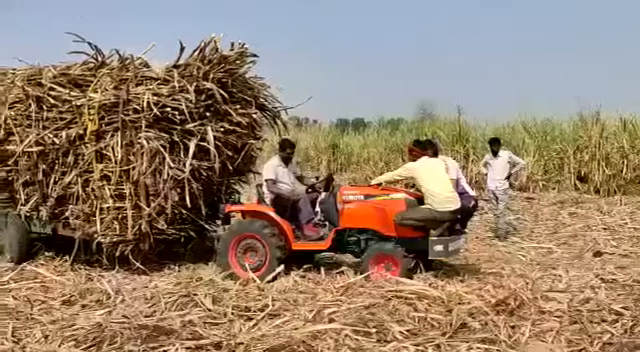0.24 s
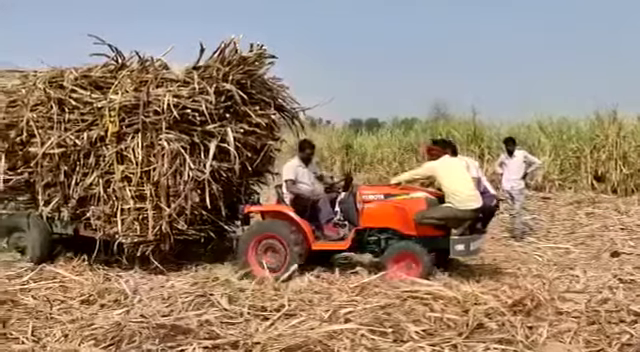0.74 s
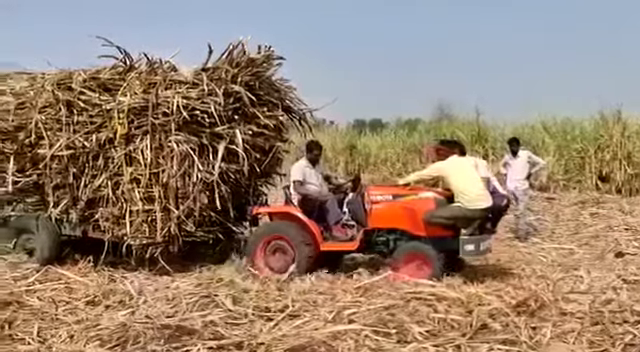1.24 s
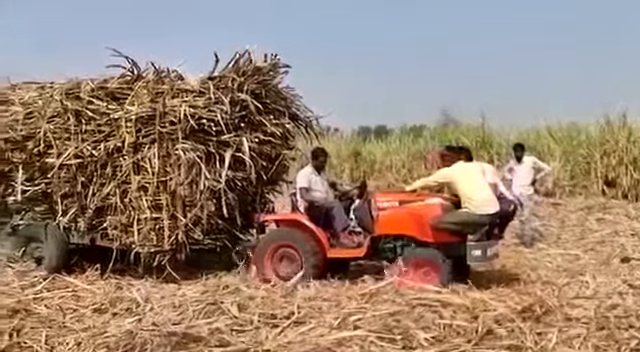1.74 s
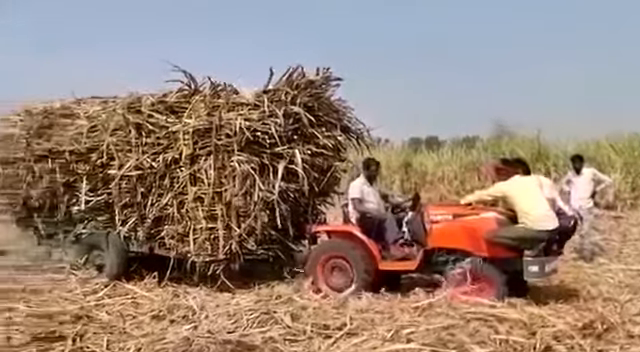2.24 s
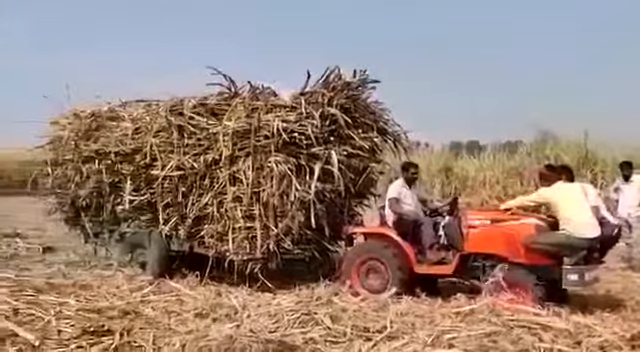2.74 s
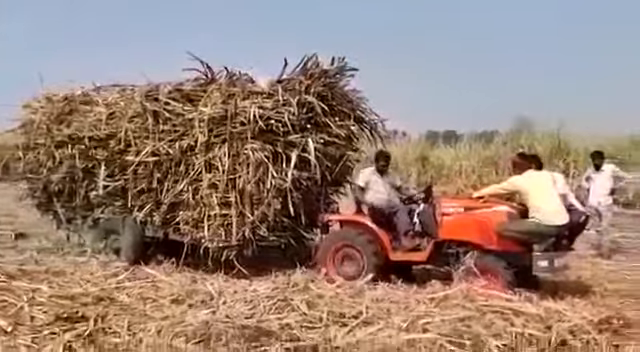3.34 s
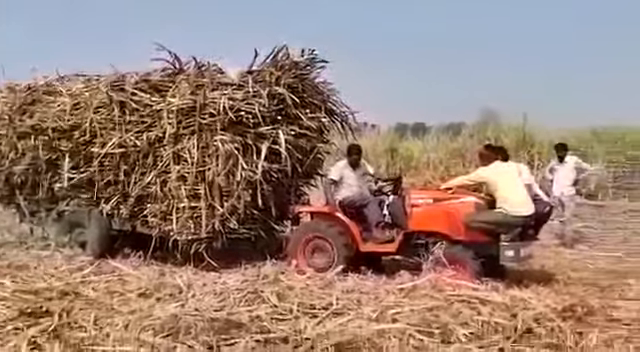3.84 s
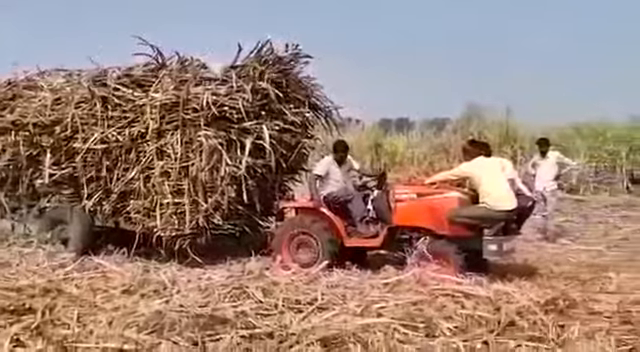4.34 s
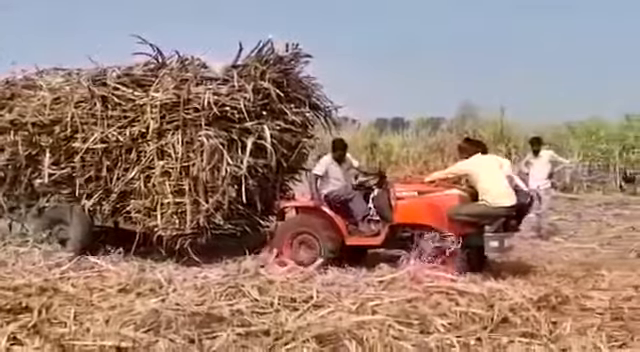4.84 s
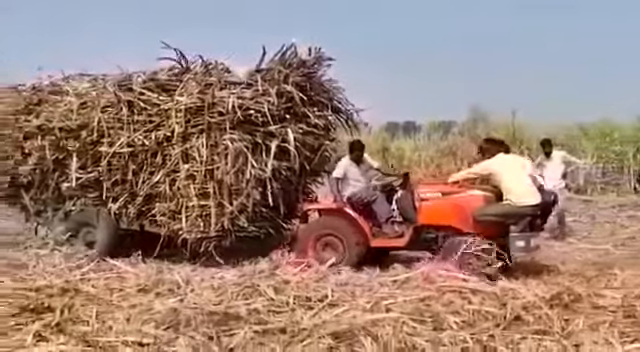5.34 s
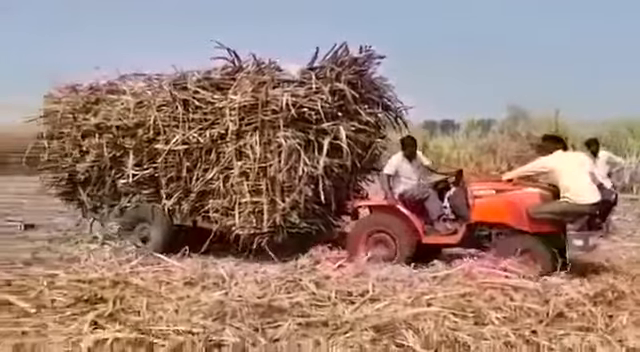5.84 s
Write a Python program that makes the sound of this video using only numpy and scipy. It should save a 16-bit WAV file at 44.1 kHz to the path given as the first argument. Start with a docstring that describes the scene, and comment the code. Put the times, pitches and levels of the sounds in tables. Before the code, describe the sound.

Outdoors in a field, heard from a few metres off, a small tractor's diesel engine climbs in speed, throbbing and clattering, its gears whining and chattering. The revs fall away to a knocking idle, then quickly rise again and stay steady as it pulls. The trailer hitch clanks twice, dry stalks crack under the wheels, and a short rising squeal comes at the close.

```python
"""Small diesel tractor hauling a load

A few metres away, a tractor drags a heavy trailer over a stubble field. It revs up with its gears
whining, sinks to idle, then revs again and holds. Each firing thumps through the exhaust pipe and
rattles the engine block. The hitch clanks, and dry stalks snap under the wheels."""
import sys
import numpy as np
from scipy import signal
from scipy.fft import rfft, irfft
from scipy.io import wavfile
from scipy.ndimage import uniform_filter1d

SR = 44100
rng = np.random.default_rng(int(sys.argv[2]) if len(sys.argv) > 2 else 0)


def dump(signal):
    """Clip the signal to [-1, 1] and save it as 16-bit WAV at the path in sys.argv[1]."""
    limited = np.clip(np.atleast_2d(signal).T, -1, 1)
    pcm = np.round(limited * 32767).astype(np.int16)
    wavfile.write(sys.argv[1], SR, pcm)


N = 268128
T = np.arange(N) / SR
HZ = np.fft.rfftfreq(N, 1 / SR)
WORKING_SPEED = 50  # engine speed is always in firings a second

# How strong each of the three cylinders is, in dB.
CYLINDER_DB = [0.68, 0.039, -.2]
# The exhaust note briefly swells or dips at set moments, mostly as the throttle opens or closes.
# Each row: middle in seconds, length in seconds, change in dB.
EXHAUST_SWELLS = [(.03, 0.07, 7), (2.02, 0.048, -5.5), (2.14, 0.29, 7.5), (2.38, 0.16, 2),
                  (3.76, 0.065, -1.5), (3.95, .1, 0.5), (4.08, 0.18, 2.5), (4.25, 0.15, 1.5)]
# How the pipe and silencer shape the sound, with the throttle open and when coasting.
# Each row: frequency in Hz, gain in dB.
PIPE_OPEN = [(30, -12), (65, -4), (100, -4.5), (122, -3), (138, -7.5), (152, -0.5), (166, 2), (182, 7),
             (205, -2.5), (232, 5), (258, 5), (285, -3), (335, -14.5), (420, -49.5), (700, -43)]
PIPE_COAST = [(30, -20.5), (70, -5.5), (110, -11.5), (140, -3), (172, 7), (202, 1.5), (238, 2), (272, -9),
              (310, -9.5), (400, -17.5), (700, -41)]
# How loud the deep throb and the exhaust note are. Each holds: level in dB coasting at working
# speed, dB added per doubling of speed, dB added by full throttle, dB added by full load.
THROB_LEVELS = (-34, -1.5, -6.5, 4)
EXHAUST_LEVELS = (-30.5, 10.5, 7, 2.5)

def exhaust(firings, speed, fuel, load):
    """Uneven firing pulses and their rushing gas ring the pipe, over a deep throb."""
    # the cylinders fire at slightly unequal steps, each a little early or late
    limp = .009 * np.sin(2 * np.pi * firings / len(CYLINDER_DB))
    ignition = firings + limp + .0035 * drift(40)
    strength = amp(CYLINDER_DB)[ignition.astype(int) % len(CYLINDER_DB)]
    # at low speed the rising piston adds a second, softer puff
    slowness = np.clip(2 - 2 * speed / WORKING_SPEED, 0, 1)
    push = amp(-6) * slowness * clicks(firings + .395, uneven_db=.5)
    pulses = steady(clicks(ignition, uneven_db=1.5) * strength + push) * amp(swells(EXHAUST_SWELLS))
    gas = steady(puffs(firings, decay_s=.024, base=.94, uneven_db=5.5) * noise())
    ragged = (1 - fuel) * np.interp(speed, [48, 60], [1, 0])  # slow running on little fuel
    flow = pulses + amp(-13.5 + 9.5 * ragged) * gas
    # the silencer holds higher notes back, drawing out each thump
    delay_s = .0055 * np.clip(HZ / 200, 0, 2)
    lag = 2 * np.pi * np.cumsum(delay_s) * SR / N
    flow = filtered(flow, np.exp(-1j * lag) * (HZ > 10))
    note = unit(fuel * ring(flow, curve(PIPE_OPEN)) + (1 - fuel) * ring(flow, curve(PIPE_COAST)))
    # one chamber hums on between slow, hard firings
    note += slowness * fuel * amp(-4) * resonance(flow, hz=208, width_hz=30)
    # near top speed the governor (a speed limiter) eases the fuel, thinning the bass
    bass_db = -3 * np.clip((speed - 64.4) / 1.8, 0, 1)
    note += (amp(bass_db) - 1) * filtered(note, 1 / (1 + (HZ / 215) ** 20))
    note *= amp(loudness(EXHAUST_LEVELS, np.minimum(speed, 51.7), fuel, load))
    throb = np.sqrt(2) * np.sin(2 * np.pi * firings) * amp(loudness(THROB_LEVELS, speed, fuel, load))
    throb /= 1 + (31.2 / speed) ** 6  # very slow firing hardly carries
    return stereo(throb - note)

# The block's roar. Each row: frequency in Hz, noise level in dB.
BLOCK_COLOUR = [(150, -1), (330, 0.5), (470, -2.5), (640, -2.5), (800, 3), (970, 5), (1200, -4),
                (1500, -2.5), (1800, -1.5), (2020, -4), (2250, -19), (3000, -10), (5000, -37.5)]
# How loud the block is, laid out like THROB_LEVELS.
BLOCK_LEVELS = (-36, 9, 3.5, 4)

def block(firings, speed, fuel, load):
    """Burning fuel shakes the engine block into a dull roar."""
    shake = puffs(firings, decay_s=.0062, base=1, uneven_db=4)
    pair = [unit(ring(shake * noise(), curve(BLOCK_COLOUR))) for _ in range(2)]
    return amp(loudness(BLOCK_LEVELS, speed, fuel, load)) * stereo(*pair)

# The noise of valves and injectors. Each row: frequency in Hz, noise level in dB.
CLATTER_COLOUR = [(1180, -40), (2000, -10), (2200, -7.5), (2410, -4), (2680, -10), (3300, -10), (3580, -7),
                  (4090, -7), (5070, -4.5), (6740, -4), (7680, 2.5), (9330, -3.5), (9800, -17),
                  (10500, -16), (13600, -59), (22000, -120)]
# Where different loose parts rattle. Each row: centre in Hz, width in Hz.
RATTLE_BANDS = [(2500, 820), (4600, 1240), (6600, 1300), (7800, 760), (9200, 1200)]
# The notes of thin covers. Each row: pitch in Hz, width in Hz, level in dB.
COVER_NOTES = [(2707, 16, -4), (3695, 18, -3), (4292, 26, -5), (4897, 18, 1), (6407, 15, -5)]
# How loud the clatter is, laid out like THROB_LEVELS.
CLATTER_LEVELS = (-33.5, 7, 2.5, 6)

def clatter(firings, speed, fuel, load, rattles_per_s=150):
    """Valves and injectors tick, loose parts rattle on their own, and thin covers buzz under load."""
    ticks = puffs(2 * firings, decay_s=.019, base=2.9, uneven_db=4)
    shares = np.array([np.exp(-((HZ - hz) / width) ** 2) + 1e-9 for hz, width in RATTLE_BANDS])
    colours = np.sqrt(shares / shares.sum(0)) * amp(curve(CLATTER_COLOUR))
    rattles = 0
    for colour in colours:
        strikes = np.cumsum(rng.random(N) < rattles_per_s / SR)
        flutter = amp(1.1 * drift(30))
        shake = (ticks + puffs(strikes, decay_s=.015, base=0, uneven_db=6.5)) * flutter
        rattles += filtered(shake * rng.standard_normal((2, N)), colour)
    buzz = load * amp(-11 + 3 * drift(5))
    pair = [unit(rattle) + buzz * unit(ring(noise(), peaks(COVER_NOTES))) for rattle in rattles]
    return amp(loudness(CLATTER_LEVELS, speed, fuel, load)) * stereo(*pair)

# Spells of hard knocking. Each row: start, end, fade-in and fade-out in seconds,
# level in dB at working speed.
KNOCK_SPELLS = [(-.04, 0.41, .04, 0.47, -38), (3.098, 3.898, 0.043, 0.23, -33),
                (3.9, 4.804, 0.23, 1.1, -35.5)]
# The notes each knock rings. Each row: pitch in Hz, width in Hz, level in dB.
KNOCK_NOTES = [(337, 103, -3.5), (990, 70, -0.5), (1440, 51, -13), (1750, 200, 1), (2006, 47, 7),
               (2640, 550, -8), (4030, 730, -14)]

def knock(firings, speed):
    """Diesel knock: a metallic ping per firing, standing out at idle and as the engine picks up."""
    level = spells(KNOCK_SPELLS, speed, db_per_doubling=11.5)
    pings = puffs(firings, decay_s=.008, base=.14, uneven_db=1.6)
    return level * stereo(*[steady(ring(pings * noise(), peaks(KNOCK_NOTES))) for _ in range(2)])

# Spells of rasping, laid out like KNOCK_SPELLS.
RASP_SPELLS = [(-.04, 0.34, 0.035, 0.23, -35), (3.734, 4.226, 0.13, 0.25, -34)]
# The rasp of injected fuel. Each row: frequency in Hz, noise level in dB.
RASP_COLOUR = [(1500, -34), (2800, -22), (3500, -2.5), (4600, 6), (6000, -5), (7600, 8.5), (8600, -16),
               (11000, -25)]

def rasp(firings, speed):
    """While the engine gathers speed, every squirt of fuel adds a bright, dry spit."""
    level = spells(RASP_SPELLS, speed, db_per_doubling=8.5)
    spits = steady(puffs(firings, decay_s=.004, base=.3, uneven_db=2))
    return level * stereo(*[unit(ring(spits * noise(), curve(RASP_COLOUR))) for _ in range(2)])

# The tones of each gear whine. Each row: cycles per firing, level in dB.
CLIMB_TONES = [(18.53, -0.5), (17.53, -17), (24.72, -22)]
CREST_TONES = [(13.9, 0), (12.4, -7), (23.05, -17), (37.15, -17)]
TOP_TONES = [(32.05, 0)]
SLACK_TONES = [(18.53, 0)]
PICKUP_TONES = [(11.3, -2), (16.95, 0), (18.2, -8), (28.3, -11)]
HAUL_TONES = [(19.81, 1.3), (11.27, -18), (16, -10.5), (16.95, -15), (21.34, -11), (26.37, -18.5),
              (26.92, -18), (32, -18)]
SHUDDER_TONES = [(16.9, 0)]
# Named sets of gears. Each entry: its tones, wobble in radians, fuzz in dB.
GEAR_SETS = {"climb": (CLIMB_TONES, .12, -20.5), "crest": (CREST_TONES, .24, -15.5),
             "top": (TOP_TONES, .3, -13), "slack": (SLACK_TONES, .5, -5),
             "pickup": (PICKUP_TONES, .35, -11), "haul": (HAUL_TONES, .12, -16),
             "shudder": (SHUDDER_TONES, .3, -9)}
# When each set whines. Each row: its name, then start, end, fade-in and fade-out in seconds,
# level in dB, change in dB per second.
GEAR_WHINES = [("climb", 0.558, 1.18, 0.2, 0.061, -17.5, -9.5),
               ("climb", 1.09, 1.59, 0.16, 0.2, -32.5, 1.6), ("climb", 1.68, 2.02, 0.29, 0.029, -29, 2.2),
               ("top", 1.64, 2.02, 0.22, 0.03, -38, 0), ("slack", 2.01, 2.12, 0.088, 0.051, -29, 0),
               ("crest", 0.99, 2.03, 0.52, 0.061, -28.5, 0), ("pickup", 2.1, 2.22, 0.13, 0.15, -41.5, -18),
               ("pickup", 4.004, 4.53, 0.43, 0.085, -37.5, 4), ("haul", 4.625, 6.2, 0.04, .1, -27.5, 1.6),
               ("shudder", 4.69, 4.75, 0.018, .03, -32, 0), ("shudder", 4.96, 5.06, 0.056, 0.048, -36, 0)]

def gears(firings):
    """Gear teeth whine while they carry load; every firing jerks the shafts ahead a little."""
    shaft = firings + .0014 * np.sin(2 * np.pi * firings)
    voices = {name: whine(shaft, *gear_set) for name, gear_set in GEAR_SETS.items()}
    sound = 0
    for name, start, end, fade_in, fade_out, db, db_per_s in GEAR_WHINES:
        sound += voices[name] * held(start, end, fade_in, fade_out) * amp(db + db_per_s * (T - start))
    return stereo(sound)

# The squeal's tones. Each row: multiple of the pitch, level in dB.
SQUEAL_PARTIALS = [(1, 4.5), (2, -0.5), (4.5, -6.5)]

def squeal(start_s=5.845, from_hz=712, to_hz=785, glide_s=.09, fade_in_s=.058):
    """A slipping part squeals upward."""
    age = np.maximum(T - start_s, 0)
    hz = to_hz + (from_hz - to_hz) * np.exp(-age / glide_s)
    level = np.minimum(age / fade_in_s, 1) * amp(-33 - 12 * age)
    return stereo(level * whine(np.cumsum(hz) / SR, SQUEAL_PARTIALS, wobble=.29, fuzz_db=-29))

# Bursts of gear chatter. Each row: middle in seconds, length in seconds, level in dB, pitch in Hz.
CHATTER_BURSTS = [(0.605, 0.067, -23, 946), (1.41, 0.03, -35, 916), (1.565, .07, -29.5, 877),
                  (2.129, 0.074, -25.5, 995), (2.281, 0.038, -33, 950), (3.157, 0.076, -42.5, 990),
                  (4.69, 0.12, -32, 895), (4.884, 0.048, -29, 870), (5.047, 0.1, -29.5, 870)]

def gear_chatter(firings):
    """As the load comes and goes, loose teeth knock together and ring the gearbox housing."""
    knocks = puffs(firings, decay_s=.021, base=.89, uneven_db=7.5) * noise()
    sound = 0
    for middle, length, db, hz in CHATTER_BURSTS:
        housing = steady(resonance(knocks, hz, width_hz=230), samples=2000)
        sound += amp(db) * bump(middle, length) * housing
    return stereo(sound)

# Blows on the hitch. Each row: start in seconds, ring level in dB, ring pitch in Hz, crack level in dB.
HITCH_BLOWS = [(3.097, -43, 980, -37), (3.116, -29.5, 970, -34.5), (3.142, -41, 1070, -29),
               (3.157, -34, 950, -30.5), (3.179, -38, 990, -34), (3.226, -34, 950, -45),
               (4.714, -24, 1040, -23.5), (4.721, -24, 853, -26), (4.746, -30, 1010, -29)]
# The crack of steel on steel. Each row: frequency in Hz, noise level in dB.
CRACK_COLOUR = [(250, -11), (900, 2), (1600, -5), (2600, -1), (4000, -2.5), (8000, -6), (11000, -22)]

def hitch():
    """The hitch takes up its slack: each blow is a hard crack and a short ring of steel."""
    rings = cracks = 0
    for start, ring_db, hz, crack_db in HITCH_BLOWS:
        steel = steady(resonance(noise(), hz, width_hz=200), samples=600)
        rings += amp(ring_db) * struck(start, decay_s=.012) * steel
        cracks += amp(crack_db) * struck(start, decay_s=.0074)
    pair = [cracks * unit(ring(noise(), curve(CRACK_COLOUR))) for _ in range(2)]
    return stereo(rings) + stereo(*pair)

# Stalks breaking. Each row: start in seconds, level in dB.
STALK_SNAPS = [(0.919, -15.5), (1.0866, -19.5), (1.157, -18), (1.18, -16), (3.818, -34), (3.852, -24),
               (4.0286, -28), (4.1239, -32), (4.1687, -29), (4.191, -24), (4.8303, -21), (5.044, -16)]

def stalks():
    """Dry stalks break under the wheels with a short, bright snap."""
    snaps = sum(amp(db) * struck(start, decay_s=.003) for start, db in STALK_SNAPS)
    return stereo(*[snaps * resonance(noise(), hz=7700, width_hz=2800) for _ in range(2)])

def lurch():
    """The sudden throttle rocks the engine on its frame with a low rumble."""
    level = amp(-40) * held(start=3.725, end=3.86, fade_in=.015, fade_out=.2)
    return stereo(level * resonance(noise(), hz=85, width_hz=150))

def breeze(corner_hz=80):
    """Moving air makes a faint, low rumble."""
    level = amp(-51 + .89 * drift(2))
    return stereo(level * unit(filtered(noise(), HZ / (HZ + 25) / (1 + (HZ / corner_hz) ** 2))))

def amp(db):
    """Turns decibels into a gain."""
    return 10 ** (np.asarray(db) / 20)

def unit(x):
    """Scales x to an average (rms) level of 1."""
    return x / np.sqrt(np.mean(x ** 2) + 1e-20)

def steady(x, samples=6000):
    """Evens out slow changes, holding the level near 1."""
    return x / np.sqrt(uniform_filter1d(x ** 2, samples) + 1e-12)

def noise():
    """Fresh white noise."""
    return rng.standard_normal(N)

def filtered(x, gain):
    """Multiplies each frequency in x by its own gain."""
    return irfft(rfft(x) * gain, N)

def drift(rate_hz):
    """A random wander, mostly slower than rate_hz."""
    return unit(filtered(noise(), 1 / (1 + (HZ / rate_hz) ** 4)))

def curve(points):
    """Joins a table's points into a value for every frequency."""
    hz, value = np.transpose(points)
    return np.interp(np.log(HZ + 1), np.log(hz + 1), value)

def peaks(notes):
    """A curve in dB with a peak at each ringing note."""
    power = sum(amp(2 * db) / (1 + ((HZ - hz) / width) ** 2) ** 2 for hz, width, db in notes)
    return 10 * np.log10(power + 1e-9)

def ring(x, gain_db):
    """Shapes x like a solid body, which rings after a blow and never before."""
    log_gain = np.log(amp(np.r_[gain_db, gain_db[-2:0:-1]]))
    phase = -signal.hilbert(log_gain).imag[:len(HZ)]
    return filtered(x, amp(gain_db) * np.exp(1j * phase))

def resonance(x, hz, width_hz):
    """Lets x ring one note, at level 1."""
    return unit(filtered(x, 1 / (1 + 2j * (HZ - hz) / width_hz) ** 2))

def clicks(count, uneven_db):
    """One click of random strength each time count passes a whole number."""
    fired = np.diff(np.floor(count), prepend=0) > 0
    return fired * amp(uneven_db * np.clip(noise(), -2, 2))

def puffs(count, decay_s, base, uneven_db):
    """A level that jumps at each click and sinks back to base."""
    return base + signal.lfilter([1], [1, -np.exp(-1 / (decay_s * SR))], clicks(count, uneven_db))

def whine(cycles, tones, wobble, fuzz_db):
    """Tones locked to one rotation; looseness blurs them, and the weak ones come and go."""
    sound = 0
    for multiple, db in tones:
        blur = 1 + amp(fuzz_db) * (drift(49) + 1j * drift(95))
        waver_db = np.clip(-db / 5, 0, 2.5) * drift(3)
        phase = 2 * np.pi * multiple * cycles + wobble * drift(12)
        sound += amp(db + waver_db) * (blur * np.exp(1j * phase)).real
    return np.sqrt(2) * sound

def held(start, end, fade_in, fade_out):
    """A level that rises from start, holds until end, then falls; all in seconds."""
    return np.clip((T - start) / fade_in, 0, 1) * np.clip(1 - (T - end) / fade_out, 0, 1)

def struck(start, decay_s):
    """A level that jumps at start and dies away."""
    return (T >= start) * np.exp(-abs(T - start) / decay_s)

def bump(middle, length):
    """A smooth rise and fall."""
    return np.exp(-(2 * (T - middle) / length) ** 2)

def swells(rows):
    """Brief rises or dips of level, in dB."""
    return sum(db * bump(middle, length) for middle, length, db in rows)

def spells(rows, speed, db_per_doubling):
    """A level that comes in spells and grows with engine speed."""
    level = sum(amp(db) * held(*timing) for *timing, db in rows)
    return level * amp(db_per_doubling * np.log2(speed / WORKING_SPEED))

def loudness(levels, speed, fuel, load):
    """A part's level in dB, set by speed, throttle and load."""
    db, doubling_db, fuel_db, load_db = levels
    return db + doubling_db * np.log2(speed / WORKING_SPEED) + fuel_db * fuel + load_db * load

# Which side is louder. Each row: frequency in Hz, left minus right in dB.
SIDE_BALANCE = [(60, 4.5), (89, 6), (130, 4), (200, 5.5), (290, 4.5), (440, 2.5), (650, 1.5), (960, 1.5),
                (1430, 0), (2130, -2.5), (3160, 1), (4700, 1), (6980, -8.5), (10400, 9.5)]
# How alike the sides are. Each row: frequency in Hz, likeness from 0 to 1.
SIDE_LIKENESS = [(60, 0.25), (130, 0.35), (260, 0.95), (550, 0.97), (1140, 0.97), (2380, 0.55),
                 (4970, 0.042), (10400, 0.64)]
# How far the left side is ahead. Each row: frequency in Hz, lead in radians.
LEFT_LEAD = [(50, 0), (250, .08), (600, .12), (1000, .45), (2000, .3), (2700, 1.3), (4400, 1.2),
             (9000, 1.5)]

def stereo(direct, scattered=None):
    """Left and right differ in level and timing; scattered sound makes them less alike."""
    left = right = rfft(direct)
    if scattered is not None:
        likeness = curve(SIDE_LIKENESS)
        right = likeness * left + np.sqrt(1 - likeness ** 2) * rfft(scattered)
    side = amp(curve(SIDE_BALANCE) / 2) * np.exp(.5j * curve(LEFT_LEAD))
    return irfft(np.array([left * side, right / side]), N)

# How fast the engine runs. Each row: time in seconds, firings a second.
ENGINE_SPEED = [(0.0, 41.56), (0.2, 46.91), (0.64, 50.54), (0.95, 55.72), (1.59, 65.36), (1.76, 66.23),
                (2.01, 64.81), (2.1, 59.6), (2.28, 52.2), (2.51, 45.2), (2.82, 35.8), (3.22, 23.2),
                (3.68, 22.4), (3.86, 30), (4.0, 39), (4.16, 46), (4.33, 52.7), (4.65, 49.1), (4.79, 50.35),
                (5.02, 50.95), (5.23, 49.95), (5.38, 49.8), (6.08, 51.6)]
# When the throttle is open. Each row: start, end and closing time in seconds.
THROTTLE_OPEN = [(.05, 1.95, 0.12), (3.7, 4.3, 0.04), (4.53, 6.2, .1)]
# The engine pulls, and the load eases as things get rolling. Each row: start and end in seconds,
# load from 0 to 1, load lost per second. The middle row adds no load.
LOAD_SPELLS = [(.42, 2.135, 0.7, 0.18), (3.698, 3, 0, 0.073), (4.52, 6.2, 1, 0.14)]
# Jolts over ruts make the block and clatter louder.
# Each row: middle in seconds, length in seconds, boost in dB.
RUT_JOLTS = [(3.14, 0.21, 5), (3.342, 0.19, 3.5), (3.745, 0.02, 5.5), (4.73, 0.05, 3.5)]

def scene():
    """One crankshaft times the engine and gears; hitch, stalks and breeze sound around them."""
    speed = np.interp(T, *np.transpose(ENGINE_SPEED))
    fuel = sum(held(start, end, .036, closing) for start, end, closing in THROTTLE_OPEN)
    fuel = np.clip(fuel, 0, 1)
    load = sum(held(start, end, .17, .097) * (weight - easing * (T - start))
               for start, end, weight, easing in LOAD_SPELLS)
    firings = .64 + np.cumsum(speed * (1 + .002 * drift(15))) / SR  # goes up by one per firing
    jolts = amp(swells(RUT_JOLTS))
    engine = exhaust(firings, speed, fuel, load) + jolts * block(firings, speed, fuel, load)
    engine += knock(firings, speed) + rasp(firings, speed)
    engine += jolts * clatter(firings, speed, fuel, load)
    drive_train = gears(firings) + squeal() + gear_chatter(firings)
    return engine + drive_train + hitch() + stalks() + lurch() + breeze()

def record(dry, cutoff_hz=10100):
    """Cuts away the highest treble."""
    low_pass = signal.firwin(255, cutoff_hz, window=("kaiser", 9), fs=SR)
    return signal.oaconvolve(dry, low_pass[None], "same")

dry = scene()
out = record(dry)
dump(out)
```